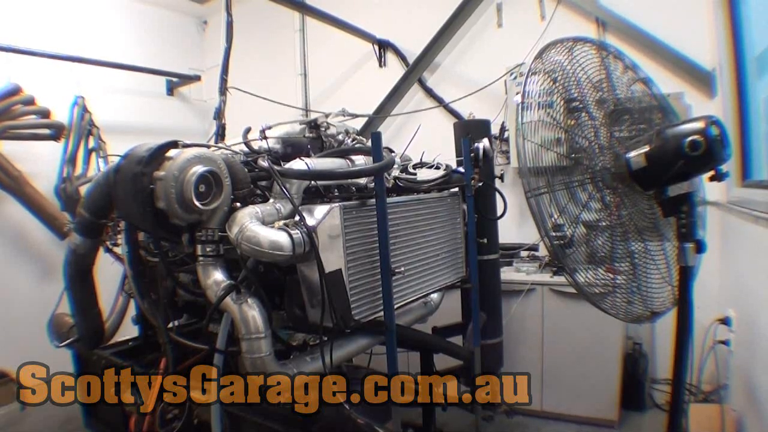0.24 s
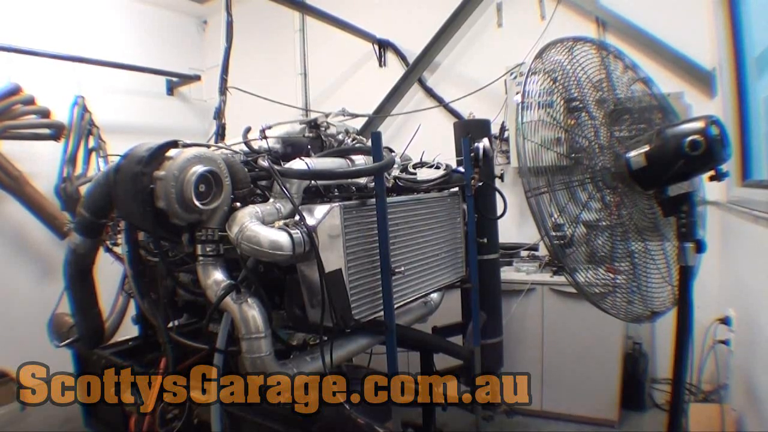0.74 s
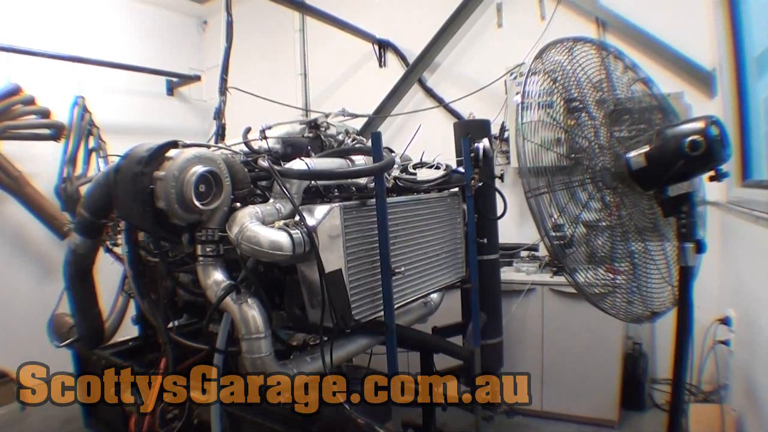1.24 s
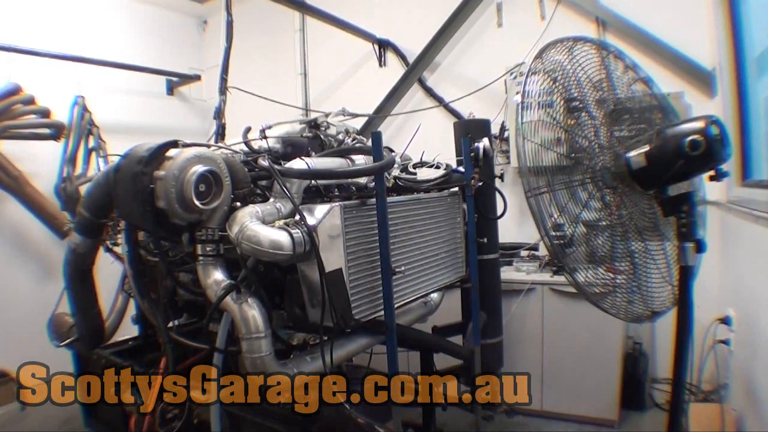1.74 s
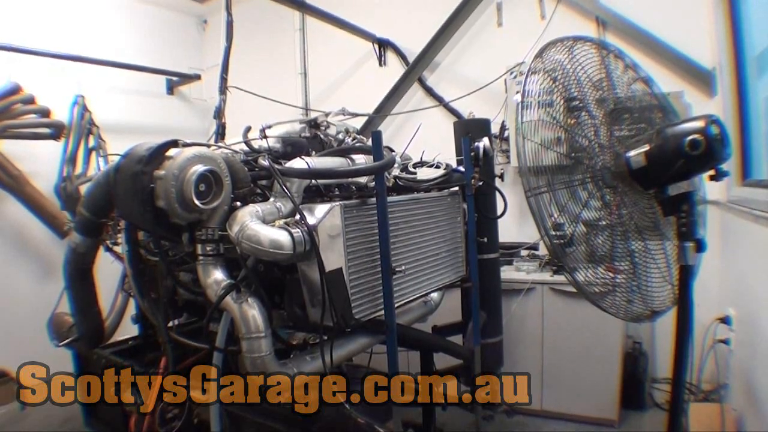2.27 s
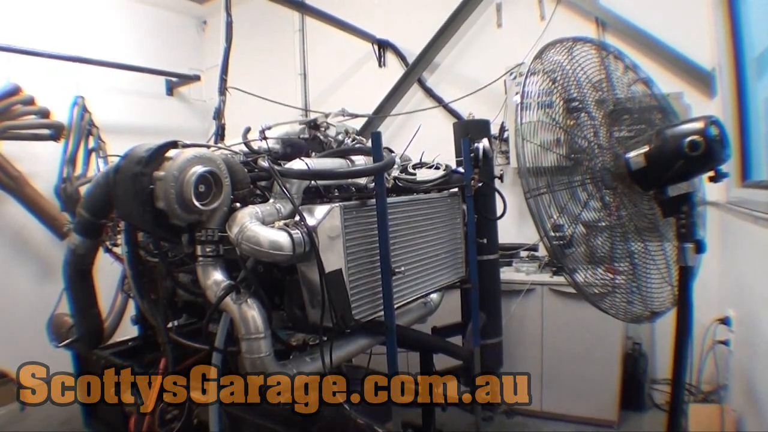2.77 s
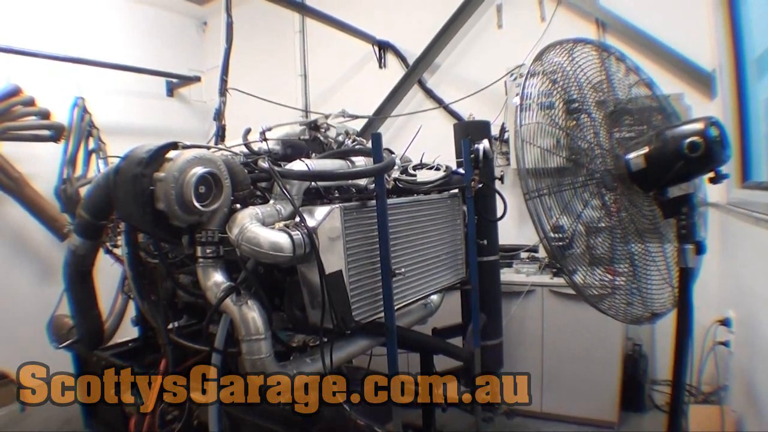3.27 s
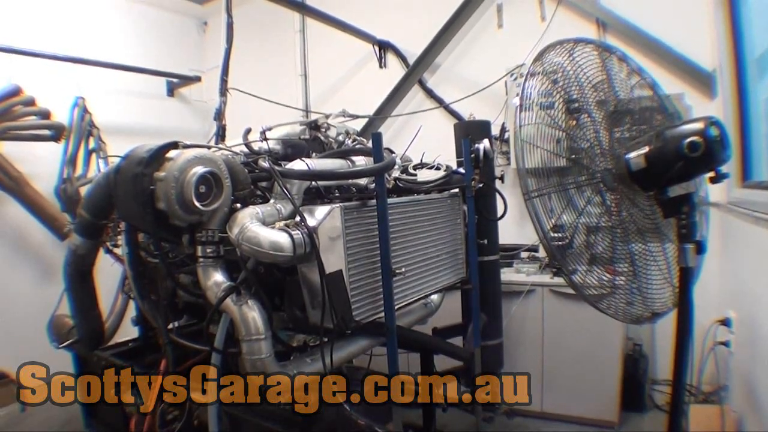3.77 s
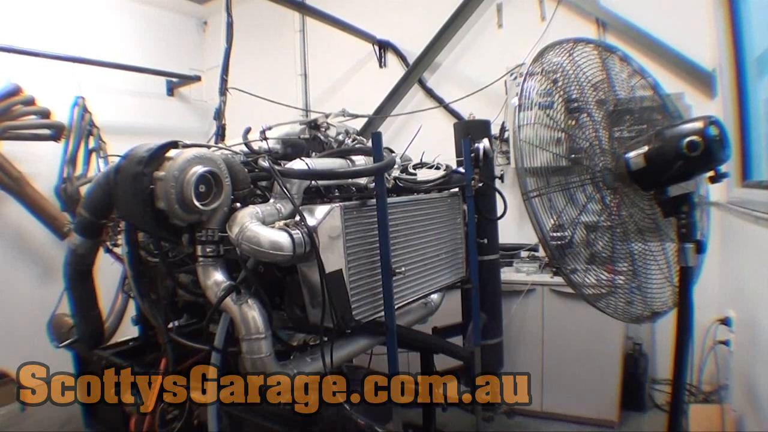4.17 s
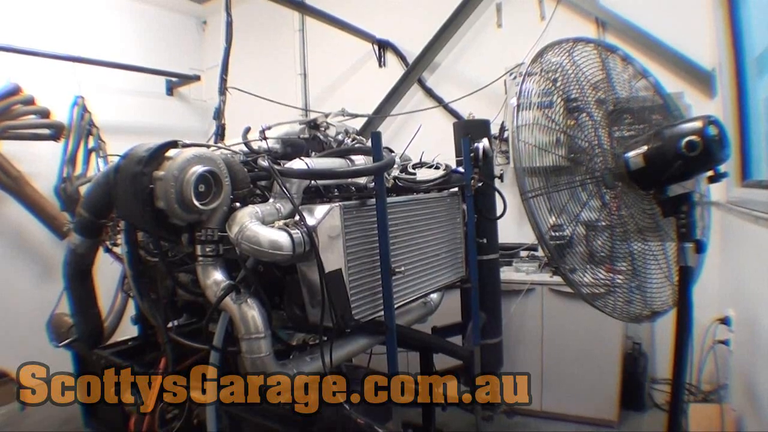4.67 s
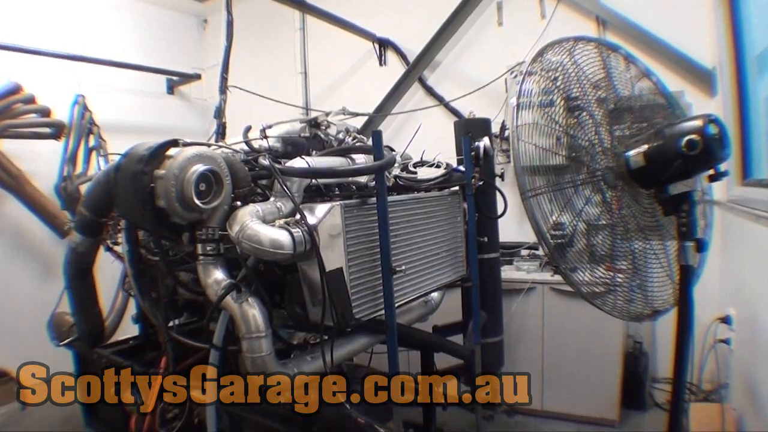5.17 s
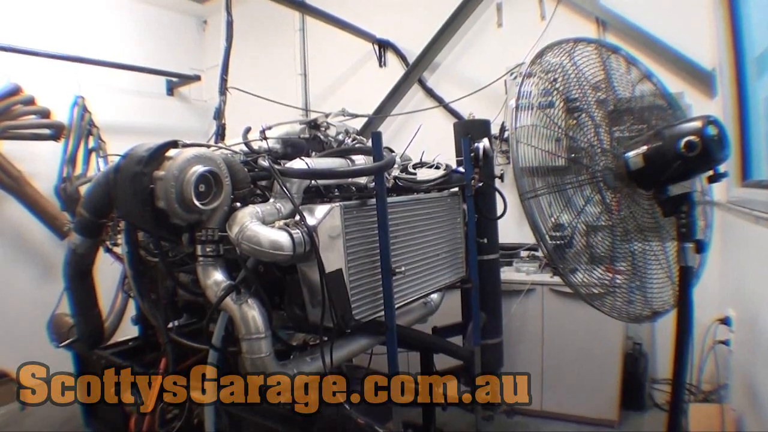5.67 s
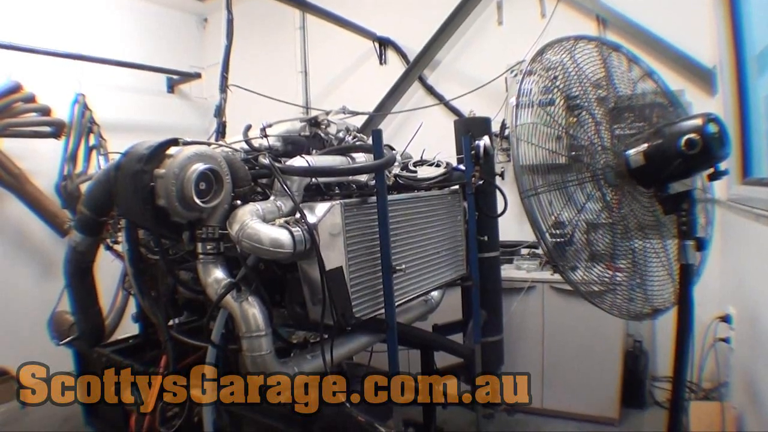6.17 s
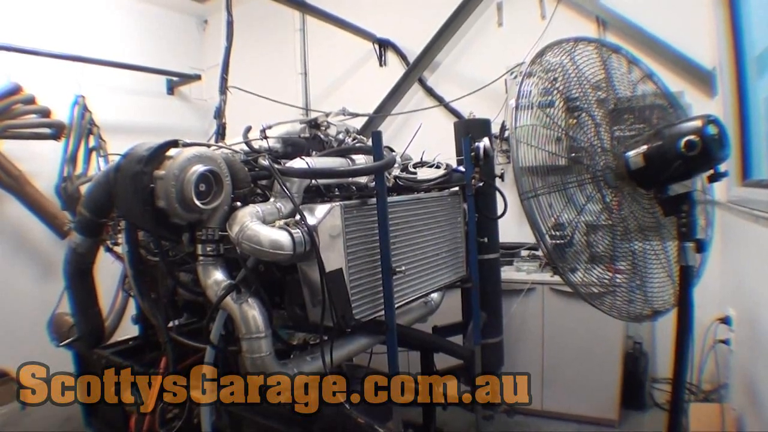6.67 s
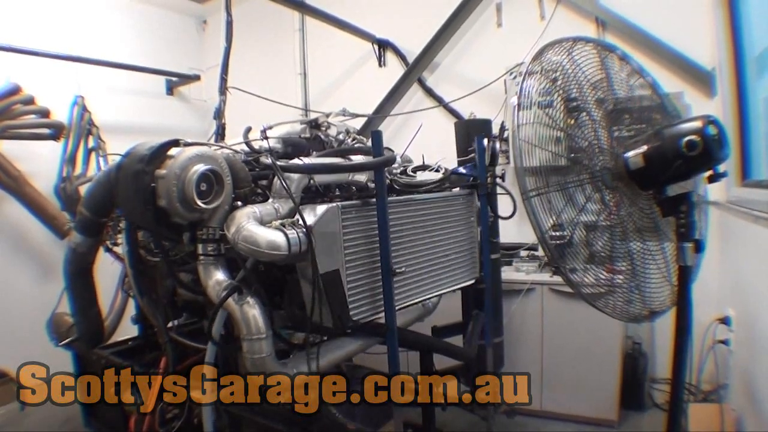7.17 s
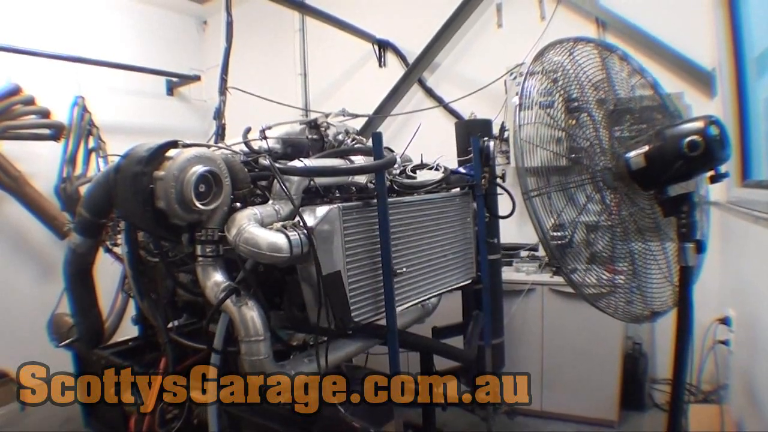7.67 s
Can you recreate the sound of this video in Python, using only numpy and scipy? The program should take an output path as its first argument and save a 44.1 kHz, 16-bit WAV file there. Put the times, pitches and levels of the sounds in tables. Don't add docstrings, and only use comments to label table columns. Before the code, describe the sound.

A turbocharged engine pulls hard in a bare room, its piercing whine climbing and holding before the throttle shuts and boost vents in a rush.

```python
import sys
import numpy as np
from scipy import signal
from scipy.io import wavfile
from scipy.ndimage import uniform_filter1d

SR = 44100
rng = np.random.default_rng(int(sys.argv[2]) if len(sys.argv) > 2 else 0)


def gain_from_db(level_db):
    decades = np.asarray(level_db, float) / 20
    return 10 ** decades


def digitize_waveform(pressure):
    field = np.atleast_2d(pressure).T
    bounded = np.clip(field, -1, 1)
    quanta = np.round(bounded * 32767).astype(np.int16)
    wavfile.write(sys.argv[1], SR, quanta)


N = 348827

SHUT_S, VENT_OPENS_S = 7.14, 7.117


def rms_one(x):
    return x / np.sqrt(np.mean(np.abs(x) ** 2) + 1e-20)


def since(start_s):
    return np.maximum(np.arange(N) / SR - start_s, 0)


def ramp(x, low, high):
    return np.clip((x - low) / (high - low), 0, 1)


def in_time(rows):
    s, *columns = np.transpose(rows)
    return [np.interp(np.arange(N) / SR, s, column) for column in columns]


def at_hz(points, hz):
    point_hz, value = np.transpose(points)
    return np.interp(np.log(hz), np.log(point_hz), value)


def drift(rate_hz):
    low_pass = signal.butter(2, rate_hz, fs=SR / 16, output="sos")
    slow = signal.sosfilt(low_pass, rng.standard_normal(N // 16 + 2002))
    settled = rms_one(slow[2000:])
    return np.interp(np.arange(N) / 16, np.arange(N // 16 + 2), settled)


def wavering_tone(hz, width_hz, steady, alike):
    low_pass = signal.butter(3, width_hz, fs=SR / 8, output="sos")
    coarse = signal.sosfilt(low_pass, rng.standard_normal((4, N // 8 + 1002)))[:, 1000:]
    mid = rms_one(coarse[0] + 1j * coarse[1])
    side = rms_one(coarse[2] + 1j * coarse[3])
    alike = np.clip(alike, 0, 1)
    height = steady + np.sqrt(1 + alike) * mid + np.sqrt(1 - alike) * side * [[1], [-1]]
    height = [np.interp(np.arange(N) / 8, np.arange(N // 8 + 2), h) for h in height]
    return rms_one(np.real(height * np.exp(2j * np.pi * np.cumsum(hz) / SR)))


def hum(hz, level_db, width_hz, steady):
    return gain_from_db(level_db) * wavering_tone(hz, width_hz, steady, alike=1.0)


def banded_noise(colour, likeness, tilt_db, pivot_hz, gust_db, patchy_db):
    edges = 2 ** np.arange(np.log2(colour[0][0]), np.log2(colour[-2][0]), 1 / 3)
    size = len(tilt_db)
    white = rng.standard_normal((2, 2, size))
    flicker = [gain_from_db(patchy_db * drift(15.6)[:size]) for _ in range(4)]
    out = 0
    for k, (low, high) in enumerate(zip(edges, edges[1:])):
        band = signal.butter(2, [low, high], "band", fs=SR, output="sos")
        mid, side = signal.sosfilt(band, white[k % 2])
        hz = np.sqrt(low * high)
        alike = np.clip(at_hz(likeness, hz), -1, 1)
        gain = gain_from_db(at_hz(colour, hz) + tilt_db * np.log2(hz / pivot_hz)) * flicker[k % 4]
        out = out + gain * (np.sqrt(1 + alike) * mid + np.sqrt(1 - alike) * side * [[1], [-1]])
    return rms_one(out * gain_from_db(gust_db))


def spool_down(shut_hz, coast_hz, sag_hz, dump_s):
    s = since(SHUT_S)
    return coast_hz - sag_hz * s + (shut_hz - coast_hz) * np.exp(-(s / dump_s) ** 2)


# time in seconds, blade tone in Hz.
SPOOL_UP = [(0, 3881), (.25, 4276), (.55, 4770), (1.0, 5330), (1.4, 5980), (1.7, 6760), (1.95, 7570),
            (2.15, 8080), (2.3, 8350), (2.48, 8500), (3.4, 8533), (4.35, 8420), (5.4, 8670), (6.3, 8870),
            (7.12, 9050)]
# time in seconds, firing rate in Hz, strength of the even orders in dB.
ENGINE_PULL = [(0, 180, -36), (.3, 191, -37), (.6, 191.5, -28.5), (1.1, 191.5, -29), (1.5, 187.5, -34),
               (1.85, 198.5, -30.5), (2.45, 195, -33), (3.35, 190.5, -31.5), (4.15, 184, -32),
               (4.6, 188, -37), (5.2, 203, -40), (5.6, 215, -31), (6.1, 228, -37), (6.55, 240, -37),
               (7.1, 250, -54), (7.91, 180, -45)]


def controls():
    shut = ramp(since(VENT_OPENS_S), 0, 0.045)
    blade_hz = in_time(SPOOL_UP)[0] + spool_down(9070, 6450, 2500, dump_s=.165) - 9070
    choke = ramp(in_time(ENGINE_PULL)[0], 214, 245.1) * (1 - shut)
    return blade_hz, shut, choke


# time in seconds, depth in dB.
GULPS = [
    (2.05, -5),
    (3.05, 0),
    (4.33, -4),
    (4.67, -4),
    (5.02, -4),
    (5.27, -4),
    (6.36, -1),
    (6.971, -2.5),
    (7.07, -2),
    (7.106, 0.5),
]


def airflow_gusts():
    blade_hz, shut, choke = controls()
    speed_depth_db = 0.38 * np.maximum(blade_hz - 4140, 0) / 1000 * (1 - shut)
    depth_db = speed_depth_db + 0.63 * choke + 1.1 * shut
    gusts_db = depth_db * (0.82 * drift(52.5) + 1.23 * drift(170.0))
    gusts_db -= uniform_filter1d(gusts_db, size=9000)
    gulp_s = 0.016
    gusts_db += sum(db * np.exp(-((since(0) - s) / gulp_s) ** 2) for s, db in GULPS)
    return gusts_db


# blade tone in Hz, level in dB.
TONE_BY_SPEED = [(3850, -33), (4100, -23), (4500, -21), (4850, -16.5), (6000, -13.5), (8400, -13),
                 (8700, -14.5), (9000, -11)]


def turbo(gusts_db):
    hz, shut, _ = controls()
    loaded_db = at_hz(TONE_BY_SPEED, in_time(SPOOL_UP)[0]) + drift(4.2)
    fading_db = -3 * since(SHUT_S)
    tone_db = loaded_db - 10 * ramp(since(SHUT_S), .02, .06) + fading_db
    wake_db = -18 + 0.54 * (loaded_db + 13.5) - 2.5 * shut + fading_db
    stalled = ramp(np.arange(N) / SR - SHUT_S, 0, 0.057)
    clean = wavering_tone(hz, width_hz=75, steady=0.51, alike=0.84)
    ragged = wavering_tone(hz, width_hz=330, steady=0, alike=0.83)
    tone = gain_from_db(tone_db + .5 * gusts_db) * ((1 - stalled) * clean + stalled * (.1 * clean + ragged))
    octave_db = -4.0 - 36.0 * np.abs(hz - 4560) / 1000
    octave = wavering_tone(2 * hz, width_hz=44, steady=.1, alike=1.0)
    octave = gain_from_db(tone_db + octave_db) * (1 - stalled) * octave
    wake = wavering_tone(.97 * hz, width_hz=1090, steady=0, alike=0.95)
    wake = gain_from_db(wake_db - 2.0 + 0.36 * gusts_db) * wake
    return tone + octave + wake


def second_turbo():
    lag_s, rise_s, ends_s = .09, .07, 7.62
    s, hz = np.transpose(SPOOL_UP)
    hz = np.interp(since(0), s + lag_s, hz) + spool_down(9070, 5350, 2050, dump_s=.2) - 9070
    parted = ramp(since(SHUT_S), 0, rise_s)
    loaded_db = at_hz(TONE_BY_SPEED, hz) - 9
    level_db = (1 - parted) * loaded_db + parted * -23.5 - 110 * since(ends_s)
    return hum(hz, level_db, width_hz=60, steady=.5)


def engine():
    hz, even_db = in_time(ENGINE_PULL)
    seventh_db = np.maximum(-28.5 - 22 * since(.4), -38)
    thrum_db = -34 - 6 * since(0) - 33 * since(1.5)
    eighth_enters = ramp(since(1.5), 0, .4)
    fourth = gain_from_db(even_db) * wavering_tone(4 * hz, width_hz=16.0, steady=1.2, alike=.5)
    eighth = gain_from_db(even_db - 5.0) * eighth_enters * wavering_tone(8 * hz, width_hz=12.0, steady=.4, alike=.3)
    seventh = gain_from_db(seventh_db) * wavering_tone(7 * hz, width_hz=35.0, steady=.1, alike=.4)
    return fourth + eighth + seventh + hum(hz, thrum_db, width_hz=25.0, steady=0.17)


def cell(x):
    t60_s, first_echo_s = .6, .006
    s = np.arange(SR // 2) / SR
    tail = rng.standard_normal((2, SR // 2)) * gain_from_db(-60 * s / t60_s) * (s > first_echo_s)
    tail = tail / np.sqrt(np.sum(tail ** 2, 1, keepdims=True))
    return signal.fftconvolve(x, tail, axes=1)[:, :N]


def cooling_fan():
    level_db = -36.5 - 14 * ramp(since(1.55), 0, .25)
    return hum(np.full(N, 317.5), level_db, width_hz=3.0, steady=3.5)


# frequency in Hz, level in dB per Hz.
ROAR_COLOUR = [(18, -56), (30, -30.5), (189, -11), (285, -8.5), (647, -4), (746, 0), (810, -5), (974, -4.5),
               (1350, -3.5), (2040, -6.5), (4000, -8.5), (5200, -85), (8800, -120)]
# frequency in Hz, level in dB per Hz.
INTAKE_COLOUR = [(2000, -17), (3500, -8), (5000, -2), (7200, -0.63), (8500, -2.5), (10000, -6.5),
                 (12000, -11.5), (14000, -14), (16000, -30)]
# frequency in Hz, left-right likeness from 0 to 1.
AIR_LIKENESS = [(60, 1), (110, 1), (200, 0.8), (360, 0.31), (660, 0.09), (1210, 0.1), (2210, 0.38),
                (4030, 0.68), (7350, 0.85), (13400, 1)]


def airflow(gusts_db):
    blade_hz, shut, choke = controls()
    khz = (blade_hz - 8500) / 1000
    coast = since(7.579)
    unloaded = 1 - ramp(since(0), 0, .64)
    roar_db = -29.5 - 4.5 * choke + 0.9 * shut - 51 * coast
    roar_tilt_db = -0.5636 - .3 * choke - 4.0 * coast
    intake_db = -23 - 3.5 * unloaded + 0.78 * khz - 3.5 * choke + 0.2 * shut - 27 * coast
    intake_tilt_db = -.3 + 1.16 * khz + 3 * choke + 3.5 * shut - 25.5 * coast
    roar = banded_noise(ROAR_COLOUR, AIR_LIKENESS, roar_tilt_db, 570, gusts_db, patchy_db=-0.13)
    intake = banded_noise(INTAKE_COLOUR, AIR_LIKENESS, intake_tilt_db, 9670, 0.71 * gusts_db, patchy_db=0.55)
    return gain_from_db(roar_db + 11.0) * roar + gain_from_db(intake_db + 10.5) * intake


# frequency in Hz, level in dB per Hz.
VENT_COLOUR = [(88, -44), (150, -21), (753, -2.5), (1310, -4.5), (1460, -1.5), (2570, -6), (5360, -7.5),
               (8950, -12.5), (12000, -42), (15600, -51), (22000, -120)]
# frequency in Hz, left-right likeness from 0 to 1.
VENT_LIKENESS = [(60, 0.95), (180, 1), (520, 0.87), (1540, 0.73), (4540, 0.8), (13400, 0.98)]


def vent():
    first_db, full_db, swell_s, hold_s = -20.5, -11, 0.349, 0.15
    s = since(VENT_OPENS_S)
    swell_db = (full_db - first_db) * ramp(s, 0.031, swell_s)
    vent_db = first_db + swell_db - 18 * since(VENT_OPENS_S + swell_s + hold_s)
    tilt_db = 5 - 6.5 * (1 - np.exp(-(s / 0.283) ** 2))
    throat_hz = 1286 + (2297 - 1286) * np.exp(-s / .28)
    out = hum(throat_hz, vent_db - 7.5, width_hz=360, steady=0)
    opens = int(VENT_OPENS_S * SR)
    rush = banded_noise(VENT_COLOUR, VENT_LIKENESS, tilt_db[opens:], 1500, 0, patchy_db=0.5)
    out[:, opens:] += gain_from_db(vent_db[opens:] + 3.0) * rush
    return out * ramp(s, 0, 0.0031)


def scene():
    gusts_db = airflow_gusts()
    tones = turbo(gusts_db) + second_turbo() + engine()
    return tones + gain_from_db(-14.0) * cell(tones) + cooling_fan() + airflow(gusts_db) + vent()


def band_limit(x):
    return signal.sosfilt(signal.butter(12, 14000, fs=SR, output="sos"), x)


# lost above in Hz, when below in dB re the usual level.
TOP_DROPS = [(11600, -3.5), (12100, -2), (12500, -1.6), (12900, -0.8)]


def record(dry):
    drive_db, ceiling = 3, 0.84
    fine = signal.resample_poly(gain_from_db(drive_db) * dry, 2, 1, axis=1) / ceiling
    squeezed = ceiling * fine / np.cbrt(1 + np.abs(fine) ** 3)
    left, right = signal.resample_poly(squeezed, 1, 2, axis=1)
    bass_cut = signal.butter(1, 40, "high", fs=SR, output="sos")
    side_band = signal.butter(2, [100, 11800], "band", fs=SR, output="sos")
    top_cut = signal.ellip(12, .3, 60, 13330, fs=SR, output="sos")
    mid = signal.sosfilt(bass_cut, left + right) / 2
    side = signal.sosfiltfilt(side_band, left - right) / 2
    x = signal.sosfilt(top_cut, [mid + side, mid - side])
    level_db = 10 * np.log10(uniform_filter1d(mid ** 2, size=4000))
    for edge_hz, below_db in TOP_DROPS:
        quiet = uniform_filter1d(1.0 * (level_db - np.median(level_db) < below_db), size=600)
        treble = signal.ellip(6, .1, 40, edge_hz, "high", fs=SR, output="sos")
        x = x - quiet * signal.sosfiltfilt(treble, x)
    return band_limit(x)


dry = scene()
out = record(dry)
digitize_waveform(out)
```